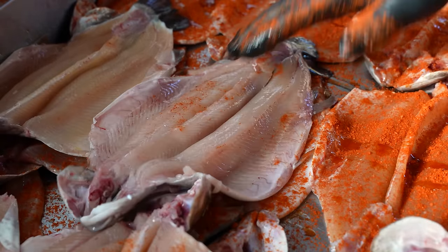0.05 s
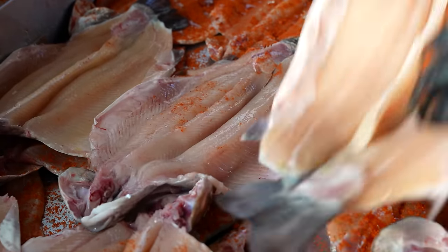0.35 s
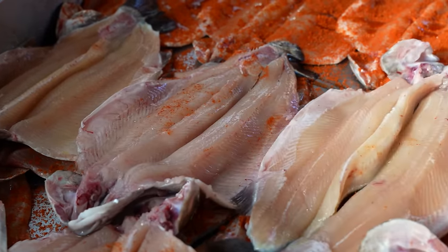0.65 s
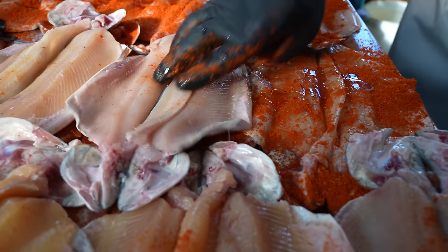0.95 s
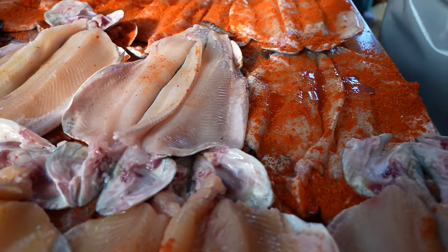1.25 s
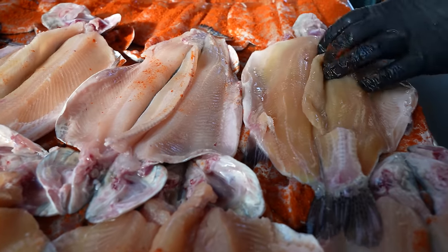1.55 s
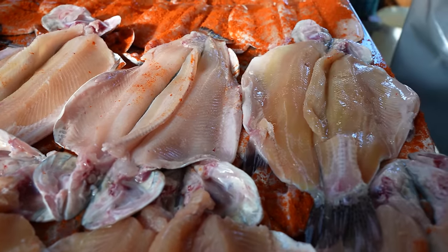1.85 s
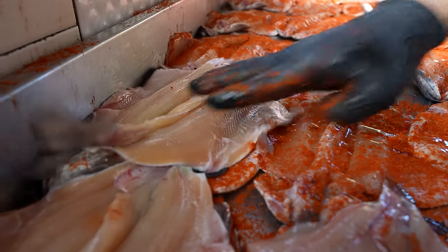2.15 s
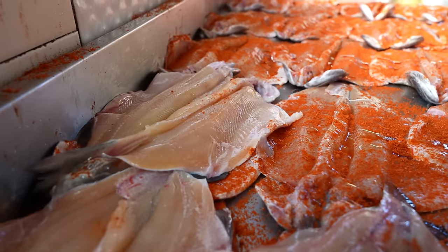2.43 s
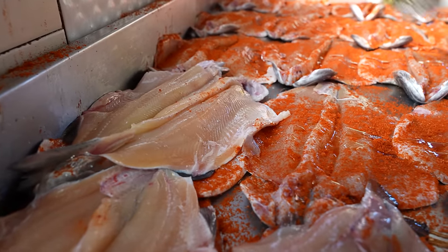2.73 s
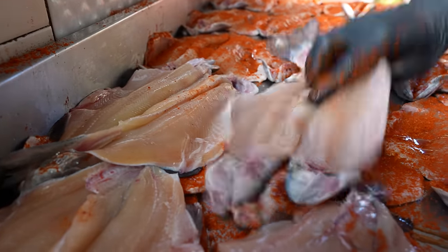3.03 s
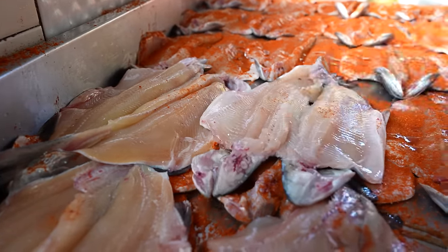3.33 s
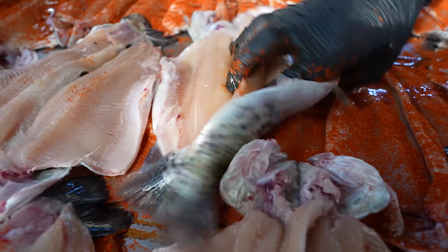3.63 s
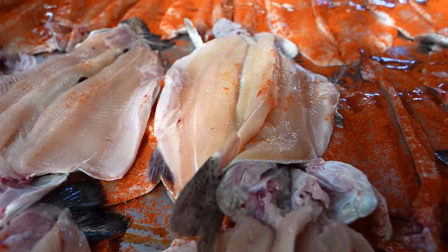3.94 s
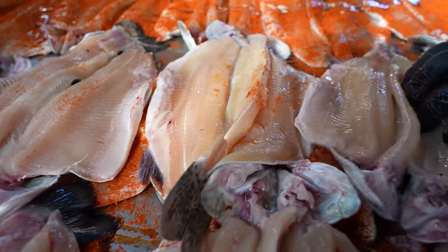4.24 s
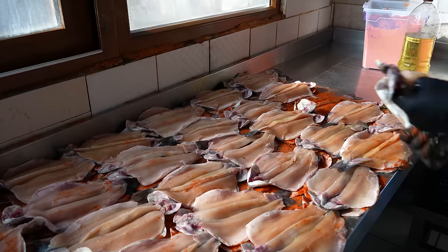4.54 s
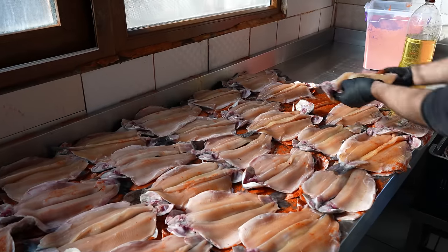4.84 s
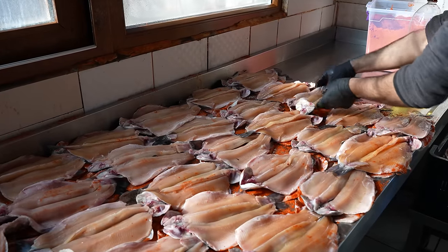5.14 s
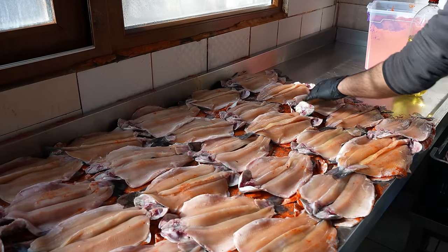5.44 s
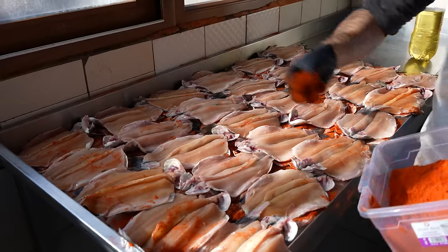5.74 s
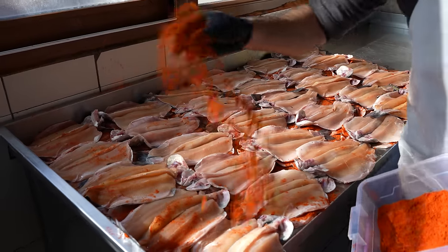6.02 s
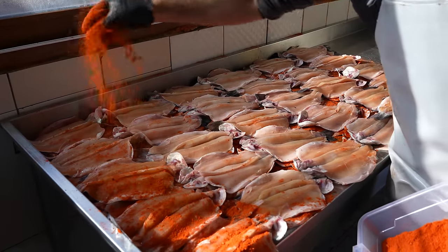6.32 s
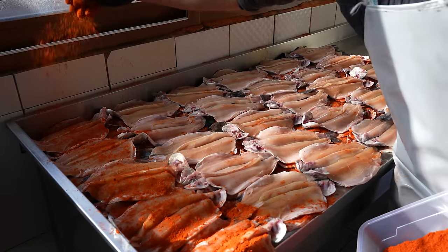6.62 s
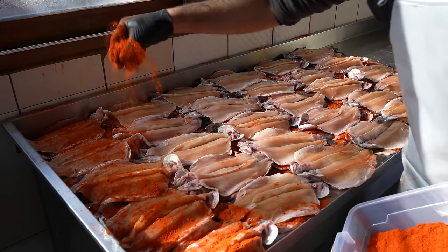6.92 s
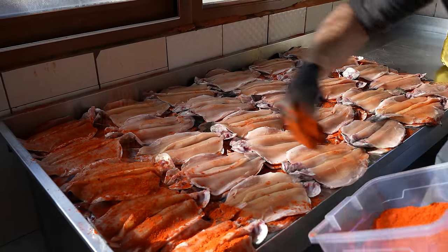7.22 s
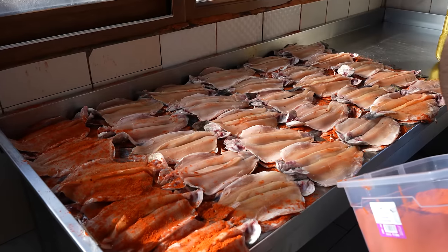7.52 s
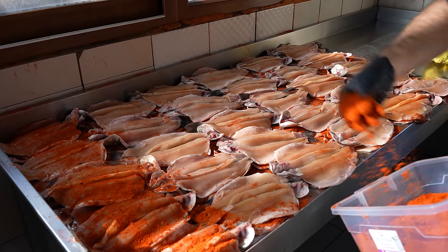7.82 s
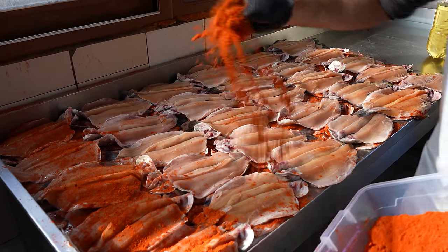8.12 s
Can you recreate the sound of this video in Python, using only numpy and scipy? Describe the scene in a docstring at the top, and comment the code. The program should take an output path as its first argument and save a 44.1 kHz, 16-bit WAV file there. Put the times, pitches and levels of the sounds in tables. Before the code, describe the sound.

Wet fish fillets slap and squelch onto a metal tray in a tiled room, followed by ringing table bumps and hissing sprinkled spice.

```python
"""A tiled preparation room, one microphone close to a full metal tray; a machine hums throughout.
For the first four seconds wet fish fillets are slapped onto the tray, each a soft thud, pops of trapped
air and a squelch, while gloves rustle and something hollow knocks further off. Distant slaps, heard mostly
through the room, go on past five seconds. From about six, bumps set the metal table ringing and spice is
thrown over the fish. Near eight, a plastic tub is tapped."""
import sys
import numpy as np
from scipy import signal
from scipy.fft import rfft, irfft
from scipy.io import wavfile

SR = 44100
rng = np.random.default_rng(int(sys.argv[2]) if len(sys.argv) > 2 else 0)


def store_wav(level_fs):
    """Save 16-bit WAV to argv[1]."""
    pcm = np.round(np.clip(np.atleast_2d(level_fs), -1, 1) * 32767)
    wavfile.write(sys.argv[1], SR, pcm.T.astype(np.int16))


N = 369116
T = np.arange(int(.5 * SR)) / SR  # time within one event, s
CLICK = signal.unit_impulse(len(T))


def amp(db):
    """Decibels to gain."""
    return 10 ** (np.asarray(db) / 20)


def unit(x):
    """Scale to unit energy."""
    return x / np.sqrt(np.sum(x ** 2) + 1e-18)


def add(track, s, x):
    """Mix x into the track from time s."""
    i = max(int(s * SR), 0)
    track[i:i + len(x)] += x[:N - i]


def band(x, hz, width_hz):
    """Two-pole band-pass."""
    w = 2 * np.pi * min(hz, .45 * SR) / SR
    a = np.sin(w) * width_hz / hz / 2
    return signal.lfilter([a, 0, -a], [1 + a, -2 * np.cos(w), 1 - a], x)


def butter(x, order, hz, kind="low"):
    """Butterworth filter."""
    return signal.sosfilt(signal.butter(order, hz, kind, fs=SR, output="sos"), x)


def along(points, hz):
    """Read (Hz, value) points on a log-frequency axis."""
    f, v = np.transpose(points)
    return np.interp(np.log(hz + 1), np.log(f), v)


def walk(rate_hz):
    """Slow random wander with a spread near 1."""
    return np.interp(np.arange(N) / SR * rate_hz, np.arange(400), rng.standard_normal(400))


def ring(hz, decay_ms):
    """A damped resonance."""
    return np.sin(2 * np.pi * hz * T) * np.exp(-T * 1000 / decay_ms)


def smear(x, shape):
    """Spread a sound over many small random arrivals of the given shape, without colouring it."""
    arrivals = rng.standard_normal(len(T)) * shape
    phase = np.angle(rfft(arrivals, 2 * len(T)))
    flat = irfft(np.exp(1j * phase))[:len(T)]
    return signal.fftconvolve(x, unit(flat))[:len(x)]


def contact(x, length_ms):
    """A soft landing: the touches build up and die away."""
    u = T * 1000 / length_ms
    return smear(x, u * np.exp(-2 * u))


def grains(length_ms, spread_db):
    """Tiny uneven clicks, swelling to an rms near 1 at a quarter of the length; cut off at 0.5 s."""
    u = 4 * T * 1000 / length_ms
    clicks = rng.standard_normal(len(T)) * amp(spread_db * np.minimum(rng.exponential(size=len(T)), 5))
    return clicks / clicks.std() * u * np.exp(1 - u)


# reverberation of the tiled room: f/Hz, t60/s
ROOM_DECAY = [(60, 0.78), (200, 0.6), (450, 0.8), (1000, 0.72), (2000, 0.58), (4500, 0.55), (8000, 0.37),
              (15000, 0.35)]
def room(x, build_ms):
    """Dense reflections off the tiles; each band dies at its own rate."""
    t = np.arange(int(1.2 * SR)) / SR
    spectrum, hz = rfft(rng.standard_normal(len(t))), np.fft.rfftfreq(len(t), 1 / SR)
    edges = np.append(0, np.geomspace(90, SR / 2, 12))
    tail = np.zeros(len(t))
    for lo, hi in zip(edges, edges[1:]):
        noise = irfft(spectrum * ((hz >= lo) & (hz < hi)), len(t))
        tail += noise * amp(-60 * t / along(ROOM_DECAY, (lo + hi) / 2))
    onset = 1 - np.exp(-(t * 1000 / build_ms) ** 2)
    return signal.fftconvolve(x, unit(tail * onset))[:N]


# spectrum of the room tone: f/Hz, relative level/dB
ROOM_SPECTRUM = [(25, -15), (45, -3), (80, -4.5), (115, 4), (160, -2), (230, -1), (300, -3), (500, -6.5),
                 (1200, -12), (2500, -17.5), (4200, -21), (8000, -29), (12000, -32.5), (16000, -38)]
# bustle all round the microphone: t/s, level/dB
BUSTLE_LEVELS = [(0, -62), (.8, -58), (1.4, -58.5), (1.8, -63.5), (2.6, -63), (3, -65), (4.1, -65.5),
                 (4.7, -59), (5.5, -64), (5.9, -60.5), (7.8, -63.5), (8.37, -64.5)]
def room_tone():
    """Room noise that swells with the work going on."""
    shape = amp(along(ROOM_SPECTRUM, np.fft.rfftfreq(N, 1 / SR)))
    air = irfft(rfft(rng.standard_normal(N)) * shape, N)
    level_db = np.interp(np.arange(N) / SR, *np.transpose(BUSTLE_LEVELS)) + 2.2 * walk(14)
    return amp(level_db) * air / air.std()


def machine_hum(hz=112.8, db=-66.5):
    """A machine in the background: one low tone, wavering a little in pitch and level."""
    phase = 2 * np.pi * np.cumsum(hz + 1.5 * walk(12)) / SR
    return np.sqrt(2) * np.sin(phase) * amp(db + 1.6 * walk(5))


# modes of the hollow thing: multiple of the lowest, relative level/dB, decay/ms
HOLLOW_MODES = [(1, 6, 1.1), (1.4, -3, 1.5), (1.85, 2.5, 3), (2.2, -2.5, 2), (3.45, -4.5, 2.2)]
# knocks across the room: t/s, level/dB, lowest mode f/Hz
HOLLOW_KNOCKS = [(.585, -27, 453), (1.115, -28, 440), (1.954, -12.5, 526), (2.282, -24.5, 490),
                 (2.695, -29.5, 420), (3.445, -23.5, 508)]
def knocks():
    """Dull knocks on something hollow; harder ones are brighter and shorter."""
    out = np.zeros(N)
    for s, db, hz in HOLLOW_KNOCKS:
        hardness = 2 ** ((db + 25.5) / 12.5)  # 1 at -25.5 dB, doubling every 12.5 dB
        body = sum(amp(mode_db) * unit(band(ring(k * hz, decay_ms), k * hz, hz))
                   for k, mode_db, decay_ms in HOLLOW_MODES)
        body = butter(body, 3, hz=1000 * hardness)
        add(out, s, amp(db) * unit(contact(body, length_ms=11 / hardness)))
    return out


def rustle(db, length_ms, hz, width_hz):
    """Fine grains in a band."""
    cloud = grains(length_ms, spread_db=6)
    return amp(db) * np.linalg.norm(cloud) * unit(band(band(cloud, hz, width_hz), hz, width_hz))


# gloves at work: t/s, rms level/dB, length/ms
GLOVE_RUBS = [(.01, -61, 210), (.778, -62.5, 350), (1.098, -63, 310), (1.92, -65.5, 260), (5.66, -73, 250)]
# faint, high squeaks: t/s, rms level/dB, length/ms
GLOVE_SQUEAKS = [(1.64, -68, 62), (3.99, -74, 69)]
def gloves():
    """Gloves rub on fish and plastic: a broad band for a rustle, a narrow one for a squeak."""
    out = np.zeros(N)
    for s, db, length_ms in GLOVE_RUBS:
        add(out, s, rustle(db, length_ms, hz=3240, width_hz=5700))
    for s, db, length_ms in GLOVE_SQUEAKS:
        add(out, s, rustle(db, length_ms, hz=3550, width_hz=470))
    return out


# spice over the tray: t/s, rms level/dB, envelope length/ms, centre f/Hz
SPICE_THROWS = [(6.11, -70, 1400, 6840), (6.304, -53, 13, 11000), (6.951, -46.5, 50, 11900),
                (7.897, -70, 110, 5260), (8.055, -59, 172, 8000)]
def spice():
    """Scooped and scattered grains make a fine, bright hiss."""
    out = np.zeros(N)
    for s, db, length_ms, hz in SPICE_THROWS:
        add(out, s, rustle(db, length_ms, hz, 1.9 * hz))
    return out


# taps on the spice tub: t/s, level/dB, f/Hz, decay/ms
PLASTIC_TAPS = [(7.9235, -46, 800, 1.4), (7.9500, -54, 3500, 0.7)]
def tub():
    """Short, dead taps on plastic."""
    out = np.zeros(N)
    for s, db, hz, decay_ms in PLASTIC_TAPS:
        add(out, s, amp(db) * ring(hz, decay_ms))
    return out


def smack(hz, width):
    """A sharp blow in one band; width is a share of the centre."""
    return unit(band(CLICK, hz, width * hz))


def thud(hz, width):
    """The low body of a blow, its treble filtered away; width is a share of the centre."""
    return unit(band(smack(hz, width), hz, 2 * hz))


def splash(length_ms):
    """The bright, wet part of a blow."""
    return contact(smack(5000, width=.9), length_ms)


# fillets far from the microphone: t/s, smack level/dB, smack f/Hz, thud level/dB, thud f/Hz
DISTANT_SLAPS = [(.001, -20, 1800, -33, 200), (1.347, -24.5, 945, -21, 300), (2.43, -29.5, 790, -29.5, 186),
                 (4.794, -25, 2180, -31, 287), (5.171, -12, 3580, -10.5, 222)]
def distant_slaps(contact_ms=2.6, splash_db=-7.5):
    """Fillets laid down further off: a broad smack with its splash over a low thud."""
    out = np.zeros(N)
    for s, db, hz, thud_db, thud_hz in DISTANT_SLAPS:
        wet = contact(smack(hz, width=.99), contact_ms) + amp(splash_db) * splash(contact_ms)
        add(out, s, amp(db) * wet + amp(thud_db) * thud(thud_hz, width=.34))
    return out


# modes of the metal table: f/Hz, relative level/dB, t60/s
TABLE_MODES = [(149.7, 0.5, 1.02), (328.7, 1.5, 0.54), (347, -4, 1.64), (389, -2, 1.27), (425, -9, 0.64),
               (532, -6.5, 1), (585, -2.5, 1.36), (617, -5, 1.4), (736, -3.5, 1.2), (848, -3, 1.3),
               (893, -2, 1.16), (960, -15, 1.2), (1040, -5, 1.4), (1074, -7, 1.07), (1250, -18, 1.4),
               (1465, -4.5, 0.98), (1610, -25, 0.83), (1860, -9, 1.07)]
def table_ring(scatter_db=2.5, rise_s=.011):
    """The metal sheet takes a moment to ring; each mode's share varies with the spot struck."""
    t = np.arange(SR) / SR
    modes = np.zeros(SR)
    for hz, db, t60 in TABLE_MODES:
        fade = amp(db + scatter_db * rng.standard_normal() - 60 * t / t60)
        modes += fade * np.sin(2 * np.pi * (hz * t + rng.uniform()))
    return unit(modes) * (1 - np.exp(-t / rise_s))


# bumps, off microphone: t/s, smack, splash and thud level/dB, thud f/Hz, boom level/dB, boom f/Hz
TABLE_BUMPS = [(5.917, -23, -29, -29.5, 335, -39, 150), (6.112, -11.5, -15, -8.5, 350, -14.5, 149),
               (6.245, -13, -40, -15, 340, -26, 162), (6.417, -13.5, -21.5, -13, 274, -21, 140),
               (6.948, -4.5, -5.5, -10.5, 282, -12.5, 106), (8.238, -35.5, -50, -41, 300, -54, 150)]
def table_bumps(contact_ms=9.5, rebound_s=.043, rebound_db=-7):
    """The metal table is bumped and drops back; returns the blows and the ringing."""
    blows, ringing = np.zeros(N), np.zeros(N)
    for s, db, splash_db, thud_db, thud_hz, boom_db, boom_hz in TABLE_BUMPS:
        body = amp(thud_db) * thud(thud_hz, width=.39)
        for lag, gain in (0, 1), (rebound_s, amp(rebound_db)):
            hit = amp(db) * contact(smack(1035, width=1.28), contact_ms)
            add(blows, s + lag, gain * (hit + body))
        add(blows, s, amp(splash_db) * splash(contact_ms))
        add(blows, s, amp(boom_db) * thud(boom_hz, width=.35))
        add(ringing, s, amp(db + .5) * table_ring())
    return blows, ringing


def tray_echoes(x, decay_ms=9, db=-14):
    """The tray's rim and the wall beside it return a quick, dull scatter."""
    scatter = smear(x, np.exp(-T * 1000 / decay_ms) * (T > .002))
    return amp(db) * butter(scatter, 1, [300, 4500], "band")


# air squeezed out under a fillet, close up: t/s, level/dB, f/Hz, decay/ms
AIR_POCKETS = [(.467, -15.5, 1510, 2), (0.4818, -26, 1260, 2.2), (.9193, -35, 1680, 0.72),
               (.9386, -27.5, 1610, 0.62), (1.4876, -24, 1280, 0.85), (2.11, -23, 1200, 1.5),
               (2.1231, -29.5, 1070, 1.8), (3.1035, -11.5, 1590, 2), (3.107, -2.5, 1470, 0.77),
               (3.6737, -30.5, 2090, 1.25), (4.2462, -27.5, 1485, 2.4), (4.2503, -22.5, 758, 4.8)]
def air_pops(glide=.12, rise_s=.00007):
    """Each pocket rings briefly, its pitch rising as the flesh closes on it."""
    out = np.zeros(N)
    for s, db, hz, decay_ms in AIR_POCKETS:
        fade = np.exp(-T * 1000 / decay_ms)
        phase = 2 * np.pi * np.cumsum(hz * (1 + glide * (.5 - fade))) / SR
        add(out, s, amp(db) * np.sin(phase) * fade * (1 - np.exp(-T / rise_s)))
    return out


def snap(db, hz, decay_ms=.31):
    """A film of water bursts."""
    burst = smear(CLICK, np.exp(-T * 1000 / decay_ms))
    return amp(db) * np.sqrt(2) * unit(band(burst, hz, 2.6 * hz))


# loud snaps, close up: t/s, level/dB, centre f/Hz
FILM_SNAPS = [(.472, -21, 10000), (0.4856, -24, 4500), (0.92, -33, 5000), (.9414, -29, 6500),
              (.956, -25, 9500), (1.491, -25.5, 5000), (1.5028, -22, 5500), (2.1098, -17.5, 4180),
              (2.1466, -19, 4430), (3.1036, -8, 7450), (3.108, -11.5, 4000), (3.1888, -29.5, 6000),
              (4.2375, -27, 6980)]
def film_snaps():
    """The water film bursts as the fillets land."""
    out = np.zeros(N)
    for s, db, hz in FILM_SNAPS:
        add(out, s, snap(db, hz))
    return out


def sticky_ticks(landings, count=4, mean_wait_s=.05, fade_db_per_s=90.5):
    """Skin sticks and lets go after each landing: small snaps, weaker the later they come."""
    out = np.zeros(N)
    for s, *_ in landings:
        for wait, db in zip(rng.exponential(mean_wait_s, count), rng.normal(-39, 3, count)):
            add(out, s + wait, snap(db - fade_db_per_s * wait, hz=7000))
    return out


def squelch(db, length_ms, hz):
    """Wet skin settling: a cloud of tiny clicks in a broad band."""
    cloud = grains(length_ms, spread_db=4.5)
    return amp(db) * np.linalg.norm(cloud) * unit(band(cloud, hz, .72 * hz))


# a fillet, or its trailing half, lands by the microphone: t/s, thud level/dB, thud f/Hz,
# tray sag level/dB, squelch level/dB, squelch length/ms, squelch f/Hz, room clap level/dB
FILLET_LANDINGS = [(.462, -20, 266, -42, -36.5, 17, 2400, -17.5),
                   (.476, -28, 138, -34, -39.5, 16, 3500, -18.5),
                   (.922, -33.5, 195, -40, -50, 27, 3400, -27.5),
                   (1.486, -25, 222, -53, -40, 12, 1950, -25.5), (1.501, -40, 220, -50, -43, 15, 4700, -37),
                   (2.107, -27, 212, -39, -42.5, 16, 4300, -23.5),
                   (2.143, -33.5, 106, -45, -53, 12, 4000, -45),
                   (3.105, -15, 211, -24.5, -29, 4.5, 3600, -16),
                   (3.671, -38, 245, -40, -48.5, 19, 3200, -34),
                   (3.695, -43, 201, -50.5, -47.5, 13.4, 5900, -47),
                   (4.246, -21, 243, -27.5, -37.5, 19, 2200, -14.5),
                   (4.271, -24, 159, -39, -58, 20, 2480, -25)]
def close_slaps(thud_cycles=.69, thud_room_db=-9, squelch_room_db=-11):
    """Wet, heavily damped flesh hits the tray; returns the direct sound and what the room is sent."""
    near, sent = np.zeros(N), np.zeros(N)
    onset = 1 - np.exp(-T / .001)
    for s, thud_db, thud_hz, sag_db, wet_db, wet_ms, wet_hz, clap_db in FILLET_LANDINGS:
        wet = squelch(wet_db, wet_ms, wet_hz)
        brush = rustle(db=-58.5, length_ms=10, hz=6000, width_hz=12000)
        add(near, s - .012, brush)  # a thin edge touches first
        slosh = squelch(clap_db - 23.5, length_ms=55, hz=776)  # the flesh wobbles
        add(near, s, wet + slosh)
        # the whole face claps into the room, where the wet clicks merge into one even burst
        add(sent, s, amp(clap_db) * smack(1150, width=.8))
        add(sent, s, amp(squelch_room_db) * np.linalg.norm(wet) * smack(wet_hz, width=2))
        # the weight arrives just after the skin, then the loaded tray gives under it
        flesh = amp(thud_db) * ring(thud_hz, decay_ms=1000 * thud_cycles / thud_hz)
        sag = amp(sag_db) * ring(hz=60.16, decay_ms=7.8)
        for lag_s, weight in (.0025, flesh), (.009, sag):
            add(near, s + lag_s, onset * weight)
            add(sent, s + lag_s, amp(thud_room_db) * onset * weight)
    return near, sent


def scene():
    """Close sounds reach the microphone mostly direct; each place has its own pattern of reflections."""
    slaps, slaps_sent = close_slaps()
    pops = air_pops()
    snaps = sticky_ticks(FILLET_LANDINGS) + film_snaps()
    near = slaps + pops + snaps
    near += tray_echoes(near)
    taps, far_slaps = tub(), distant_slaps()
    bumps, ringing = table_bumps()
    far = butter(far_slaps + bumps, 1, hz=11000)
    hollow, rustles = knocks(), gloves() + spice()
    direct = near + taps + ringing + amp(-11) * far + amp(-5) * hollow + amp(-4) * rustles
    near_sent = slaps_sent + amp(-27) * pops + amp(-19) * snaps + amp(-6) * taps
    reflected = room(near_sent, build_ms=4) + room(far, build_ms=4.4)
    reflected += room(hollow + amp(-3) * rustles, build_ms=1)
    return (direct + reflected + room_tone() + machine_hum())[None]


def record(dry):
    """The microphone sheds the deepest bass and the top is cut."""
    thin = butter(dry, 2, 35, "high")
    return signal.sosfilt(signal.ellip(8, .2, 70, 15900, fs=SR, output="sos"), thin)


dry = scene()
out = record(dry)
store_wav(out)
```